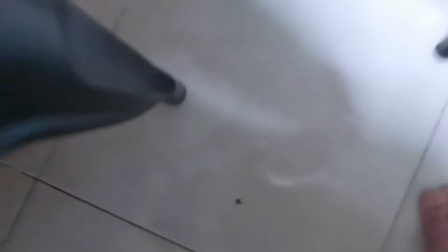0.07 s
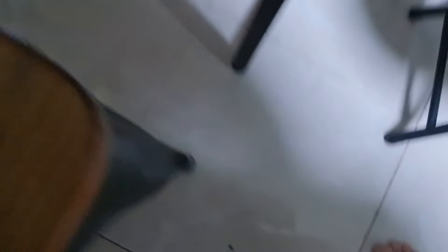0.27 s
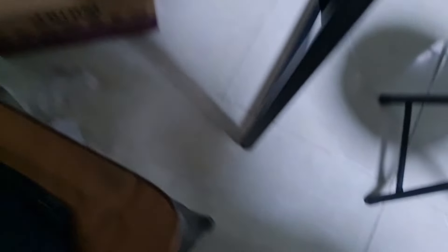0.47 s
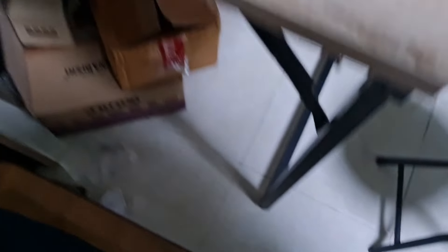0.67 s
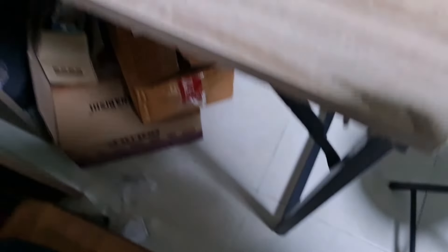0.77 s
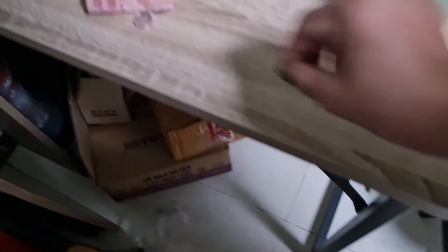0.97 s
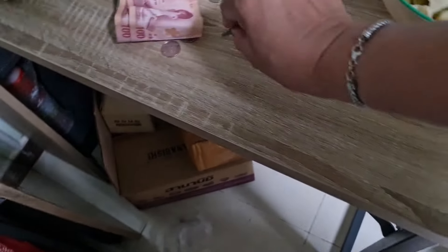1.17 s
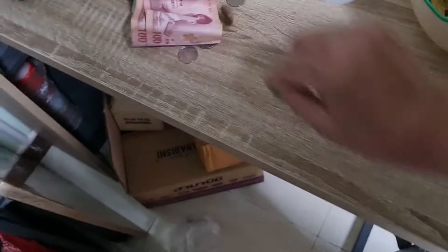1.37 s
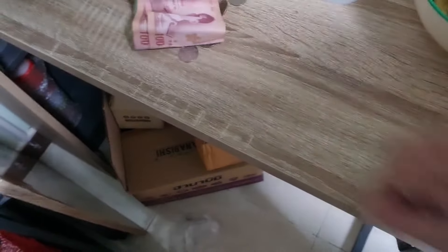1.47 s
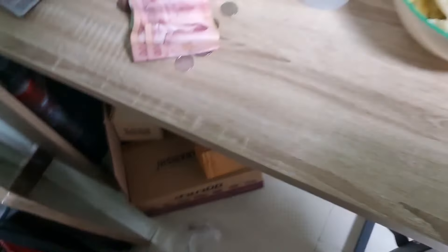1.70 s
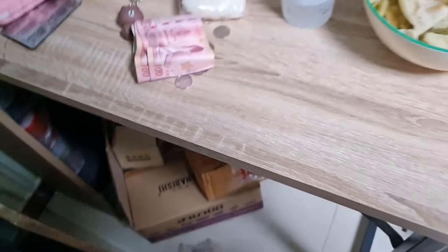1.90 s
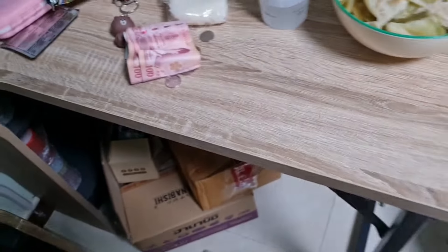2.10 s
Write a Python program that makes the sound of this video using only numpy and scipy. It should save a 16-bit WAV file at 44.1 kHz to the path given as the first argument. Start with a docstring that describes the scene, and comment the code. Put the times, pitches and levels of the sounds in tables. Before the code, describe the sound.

A coin lands on a wooden desk with a sharp knock, bounces, then rattles faster and softer until flat. Faint rustling and small bumps come first, over low appliance hum in a small room, closely miked.

```python
"""A coin drops on a wooden desk, bounces from face to rim and rattles ever faster until it lies flat.
Each contact is a noise burst and damped modes for the board, a bright burst for the rim and
high wavering modes for the ringing coin; decaying noise tails make the small room answer.
Behind it an appliance hums in steady sine tones over soft air noise. Someone moving is heard as
shaped noise for rustle, rumble and brushing, with low bumps, small ticks and thin rings."""
import sys
import numpy as np
from scipy import signal
from scipy.fft import rfft, irfft, next_fast_len
from scipy.io import wavfile
from scipy.ndimage import map_coordinates

SR = 44100
rng = np.random.default_rng(int(sys.argv[2]) if len(sys.argv) > 2 else 0)


def unload_wav(signal):
    """Save mono or channel-first audio to the path in sys.argv[1] as 16-bit WAV at rate SR, clipped to [-1, 1]."""
    wavfile.write(
        sys.argv[1],
        SR,
        np.round(np.clip(np.atleast_2d(signal).T, -1, 1) * 32767).astype(np.int16),
    )


N = 94594


def amp(db):
    """Gain from decibels."""
    return 10 ** (np.asarray(db) / 20)


def unit(x):
    """Scale to rms 1."""
    return x / np.sqrt(np.mean(x ** 2) + 1e-20)


def along(points, hz):
    """Read (frequency [Hz], value) points on a log frequency axis."""
    f, v = np.transpose(points)
    return np.interp(np.log(hz + 1), np.log(f + 1), v)


def level(points):
    """Gain per sample from (time [s], level [dB]) points."""
    return amp(np.interp(np.arange(N) / SR, *np.transpose(points)))


def wobble(rate, count=N):
    """A smooth random curve with rate knots a second."""
    knots = rng.standard_normal(int(count * rate / SR) + 4)
    return map_coordinates(knots, [np.arange(count) * rate / SR])


def fade(t, t60):
    """Exponential decay, 60 dB down after t60 seconds."""
    return amp(-60 * t / t60)


DULL_HZ = 2230  # corner of the bass shelf


def colour(x, points, bass_db=0):
    """Minimum-phase filter through (frequency [Hz], level [dB]) points, unit power before the bass shelf."""
    n = x.shape[-1]
    m = 2 ** int(np.ceil(np.log2(n)) + 1)
    hz = np.fft.rfftfreq(m, 1 / SR)
    shelf = amp(bass_db / (1 + (hz / DULL_HZ) ** 2))
    gain = unit(amp(along(points, hz))) * shelf
    # folding the cepstrum forward in time makes the filter causal
    cepstrum = irfft(np.log(gain + 1e-6))
    cepstrum[1:m // 2] *= 2
    cepstrum[m // 2 + 1:] = 0
    return irfft(rfft(x, m) * np.exp(rfft(cepstrum)))[..., :n]


def add(out, s, sound):
    """Mix a sound in at time s."""
    part = out[:, round(s * SR):][:, :sound.shape[-1]]
    part += sound[..., :part.shape[1]]


def noise(points, width):
    """Coloured stereo noise of rms 1; width is the share of side signal."""
    mid, side = colour(rng.standard_normal((2, N)), points)
    return unit(np.array([mid + width * side, mid - width * side]))


WANDER_HZ, WANDER_RAD, FLUTTER_DB = 45, .55, 3  # knots a second, phase drift, level flutter


def waver(count):
    """Random drift in phase and flutter in level, a little different in each channel."""
    common = wobble(WANDER_HZ, count)
    own = np.array([wobble(WANDER_HZ, count), wobble(WANDER_HZ, count)])
    return WANDER_RAD * (common + .5 * own), amp(FLUTTER_DB * own)


def ring(modes, t, spread, scatter_db=2):
    """Damped, wavering modes; each blow and each channel gets them a little differently."""
    out = np.zeros((2, len(t)))
    drift, flutter = waver(len(t))
    for hz, db, t60 in modes:
        phase = rng.uniform(0, 2 * np.pi) + spread * rng.standard_normal((2, 1)) + drift
        gain = amp(db + scatter_db * rng.standard_normal((2, 1)))
        out += gain * fade(t, t60) * np.sin(2 * np.pi * hz * t + phase)
    onset = 1 - fade(t, 0.0023)
    return out * flutter * onset


MONO_BELOW_HZ = 540


def narrow_bass(x):
    """Two close microphones hear long waves alike, so the side signal loses its bass."""
    mid, side = (x[0] + x[1]) / 2, (x[0] - x[1]) / 2
    high_pass = signal.butter(2, MONO_BELOW_HZ, "high", fs=SR, output="sos")
    side = signal.sosfilt(high_pass, side)
    return np.array([mid + side, mid - side])


# air of the room: (frequency [Hz], relative level [dB])
AIR_COLOUR = [(25, -1.5), (55, -0.5), (110, -1), (200, -3.5), (290, -14), (400, -12), (700, -24),
              (2000, -37.5), (6500, -38.5), (9000, -55), (16000, -58)]
AIR_DB = -53.5


def room_air():
    """Steady soft noise of the room, weighted to the bass."""
    return amp(AIR_DB) * noise(AIR_COLOUR, width=0.51)


# tones of the appliance: (frequency [Hz], relative level [dB])
HUM_TONES = [(99, -57.5), (166, -54.5), (199, -61.5), (382, -73)]
# swell of the whole hum: (time [s], level [dB])
HUM_SWELL = [(0, 1), (.35, 2), (1.05, -0.5), (1.22, -4), (2.14, -7.5)]


def hum():
    """Appliance tones, slightly unsteady in level and phase."""
    t = np.arange(N) / SR
    tones = np.zeros(N)
    for hz, db in HUM_TONES:
        gain = np.sqrt(2) * amp(db + 1.63 * wobble(8.77))  # root 2 makes the level an rms
        tones += gain * np.sin(2 * np.pi * hz * t + .5 * wobble(8.98))
    return level(HUM_SWELL) * tones


# low rumble: (frequency [Hz], relative level [dB])
RUMBLE_COLOUR = [(25, -12), (55, 3), (100, -1.5), (160, 0), (300, -22), (800, -54)]
# its course: (time [s], level [dB])
RUMBLE_COURSE = [(0, -75), (.25, -58), (.55, -55.5), (.68, -74), (1.3, -69), (1.65, -52.5), (1.93, -51.5),
                 (2.14, -61)]


def rumble():
    """Low, nearly mono noise that swells and sinks with the movement."""
    return level(RUMBLE_COURSE) * noise(RUMBLE_COLOUR, width=0.25)


# rustle: (frequency [Hz], relative level [dB])
RUSTLE_COLOUR = [(150, 2), (400, -3), (1000, 0), (2000, -6), (3000, -6.5), (6500, -13), (9500, -23.5),
                 (15500, -24)]
# its strokes: (time [s], level [dB])
RUSTLE_STROKES = [(0, -73.5), (.15, -69), (.22, -63), (.32, -57.5), (.42, -61), (.56, -70), (.63, -68.5),
                  (.655, -58.5), (.71, -65), (.79, -66), (.92, -78.5), (1.1, -66.5)]
# the quiet it drops to and holds: (time [s], level [dB])
RUSTLE_QUIET = [(1.1, -77)]
RUSTLE_GRAIN_DB = 1


def rustle():
    """Wide noise in soft strokes, its level roughened by a quick random grain."""
    strokes = level(list(RUSTLE_STROKES) + list(RUSTLE_QUIET))
    grain = amp(RUSTLE_GRAIN_DB * wobble(90.4))
    return strokes * grain * noise(RUSTLE_COLOUR, width=0.99)


# soft brushing just before the drop: (time [s], level [dB])
BRUSH_STROKE = [(1.12, -100), (1.15, -69), (1.28, -62.5), (1.36, -100)]
# its colour: (frequency [Hz], relative level [dB])
BRUSH_COLOUR = [(600, -14), (1600, -6), (2100, 2), (2500, -5), (3400, -3), (6000, -14), (9000, -29)]


def brushing():
    """One stroke of mid-range noise."""
    return level(BRUSH_STROKE) * noise(BRUSH_COLOUR, width=0.67)


# soft bumps: (time [s], level [dB])
BUMP_HITS = [(0.404, -35.5), (0.504, -40), (1.029, -43)]
BUMP_HZ, BUMP_T60_S = 56.3, 0.19


def bumps(out, t):
    """Mix in soft bumps: a damped low sine with a rounded onset."""
    for s, db in BUMP_HITS:
        envelope = fade(t, BUMP_T60_S) * (1 - fade(t, .03))
        add(out, s, amp(db) * envelope * np.sin(2 * np.pi * BUMP_HZ * t))


# handling ticks: (time [s], level [dB], centre frequency [Hz])
TICK_HITS = [(0.883, -56.5, 5070), (1.05, -59, 3000), (1.13, -58, 2800)]
TICK_T60_S, TICK_FAR_DB = .04, -45  # decay, level far from the centre frequency


def ticks(out, t):
    """Mix in small ticks: short noise bursts in a band round their centre."""
    for s, db, hz in TICK_HITS:
        band = [(hz / 4, TICK_FAR_DB), (hz / 2, -18), (hz, 0), (hz * 1.52, -8), (hz * 3, TICK_FAR_DB)]
        burst_noise = fade(t, TICK_T60_S) * rng.standard_normal((2, len(t)))
        add(out, s, amp(db) * colour(burst_noise, band))


# faint thin rings: (time [s], mean level [dB], frequency [Hz], t60 [s])
THIN_RINGS = [(.425, -65, 2850, .6), (.648, -63, 1010, .15), (1.13, -72, 2090, .8)]


def thin_rings(out, t):
    """Mix in single damped modes, broken up by a fast random curve."""
    for s, db, hz, t60 in THIN_RINGS:
        add(out, s, ring([(hz, db, t60)], t, spread=0.42) * wobble(160, len(t)))


def movement():
    """Someone moving: noise layers with bumps, ticks and thin rings on top."""
    out = rustle() + rumble() + brushing()
    t = np.arange(SR // 2) / SR
    bumps(out, t)
    ticks(out, t)
    thin_rings(out, t)
    return out


SNAP_SHARE, SNAP_LAG_S = 0.33, .0003  # the snap comes late in the left channel
SAME_SHARE = .65  # power share of the paths that every blow has in common
EARLY_DB, EARLY_T60_S = -7.5, 0.12  # near walls


def burst(t, paths, hold, t60, room_db, room_t60):
    """A snap, a dense short shudder, then near walls and the room, as decaying noise."""
    direct = fade(np.maximum(t - hold, 0), t60)
    early = amp(EARLY_DB) * fade(t, EARLY_T60_S)
    room = amp(room_db) * fade(t, room_t60)
    envelope = np.sqrt(direct ** 2 + early ** 2 + room ** 2)
    fresh = rng.standard_normal(paths.shape)
    out = envelope * (np.sqrt(SAME_SHARE) * paths + np.sqrt(1 - SAME_SHARE) * fresh)
    snap = SNAP_SHARE * np.linalg.norm(direct)
    out[[0, 1], [round(SNAP_LAG_S * SR), 0]] += snap
    return out


# colour of the knock: (frequency [Hz], relative level [dB])
KNOCK_COLOUR = [(100, -36), (280, -11.5), (410, -9.5), (530, -5.5), (650, -6), (1000, -3), (1350, -1),
                (2000, -2.5), (2900, -1.5), (4100, -0.5), (5000, -6.5), (5600, -13), (6400, -7),
                (7400, -19.5), (9000, -29.5), (11000, -16.5), (16000, -39)]
HARD_DB, DULL_DB_PER_DB = -10.5, 0.3148  # knock with a flat shelf, bass change per dB of knock


def board_knock(t, paths, knock_db):
    """The board's broad thud; light taps give less bass than hard blows."""
    bass_db = DULL_DB_PER_DB * (knock_db - HARD_DB)
    thud = burst(t, paths, hold=0.0016, t60=0.025, room_db=-11, room_t60=0.27)
    return colour(thud, KNOCK_COLOUR, bass_db)


# modes of the board: (frequency [Hz], mean relative level [dB], t60 [s])
BOARD_MODES = [(537.3, -2.5, 0.14), (828, -3, .15), (1059, -3, 0.17), (1363, 0, 0.17), (1419, -3, 0.34),
               (1660, -7.5, 0.25), (1925, 0, 0.21), (2096, 1, 0.25), (2390, -7, 0.069), (2570, -5, .15),
               (2974, 3, 0.26), (3524, 0, 0.24), (4150, -3, 0.38), (4770, -11, 0.12)]
BOARD_DB = -13.5


def board_ring(t):
    """The wood's own damped modes, sounding under each knock."""
    return amp(BOARD_DB) * ring(BOARD_MODES, t, spread=1.17) / np.sqrt(len(BOARD_MODES) / 2)


# colour of the rim click: (frequency [Hz], relative level [dB])
CLICK_COLOUR = [(1000, -37), (4500, -3.5), (6500, 5.5), (9000, -0.5), (11000, 1.5), (13000, 0.5),
                (15500, 0), (16600, -29)]


def rim_click(t, paths):
    """The hard rim's bright, very short burst; reversed paths keep it apart from the knock."""
    tap = burst(t, paths[:, ::-1], hold=0.00064, t60=0.015, room_db=-15, room_t60=0.26)
    return colour(tap, CLICK_COLOUR)


# modes of the coin: (frequency [Hz], mean relative level [dB], t60 before the settling damping [s])
COIN_MODES = [(10402, -0.5, 0.75), (11270, -12.5, 0.77)]
TUMBLE_HZ, TUMBLE_DEPTH = 25.7, 0.41
FLAT_DAMP_DB_PER_S = 450  # extra damping reached as the coin lies down


def coin_ring(t, flat):
    """High modes that the turning coin beams to and fro, damped more the flatter it lies."""
    tumble = 1 - TUMBLE_DEPTH * np.cos(2 * np.pi * TUMBLE_HZ * t)
    return ring(COIN_MODES, t, spread=0.27) * tumble * amp(-FLAT_DAMP_DB_PER_S * flat * t)


# last spin on the rim: start and stop time, first gap, each gap over the one before
SPIN_START_S, SPIN_STOP_S, SPIN_GAP_S, SPIN_SHRINK = 1.959, 2.059, .0085, 0.95
SPIN_KNOCK_DB, SPIN_CLICK_DB, SPIN_RING_DB = -32.5, -40.5, -64  # mean levels at the start
SPIN_FADE_DB, SPIN_SCATTER_DB = 3.5, 2.5


def spin():
    """Contacts of the rim crowd together and weaken as the coin settles."""
    rows, s, gap = [], SPIN_START_S, SPIN_GAP_S
    for luck in rng.standard_normal(40):
        if s < SPIN_STOP_S:
            progress = (s - SPIN_START_S) / (SPIN_STOP_S - SPIN_START_S)
            db = SPIN_SCATTER_DB * luck - SPIN_FADE_DB * progress
            rows.append((s, SPIN_KNOCK_DB + db, SPIN_CLICK_DB + db, SPIN_RING_DB + db))
        s += gap
        gap *= SPIN_SHRINK
    return rows


# contacts of the coin before the spin, levels relative to the coin layer:
# (time [s], board knock level [dB], rim click level [dB], coin ring level [dB])
COIN_CONTACTS = [(1.3075, -20, -30, -55), (1.3098, -8.5, -33, -51), (1.4268, -24.5, -54, -66),
                 (1.4375, -14.5, -39, -26.5), (1.4405, -16, -15.5, -28), (1.5152, -15, -26.5, -31.5),
                 (1.5556, -17.5, -37, -37), (1.6171, -19, -26, -57), (1.6301, -17, -20.5, -60),
                 (1.644, -24, -44, -53), (1.6802, -23.5, -32.5, -35), (1.7179, -22.5, -31, -64),
                 (1.7423, -29, -33, -60), (1.7667, -22, -23, -58), (1.772, -24.5, -29, -57),
                 (1.778, -24, -26.5, -46), (1.8115, -30.5, -26.5, -36), (1.8241, -23.5, -36, -45),
                 (1.8295, -23.5, -24.5, -57), (1.8402, -27.5, -29, -54), (1.8675, -27, -37, -50),
                 (1.8745, -23.5, -33, -51), (1.8792, -30.5, -27, -63), (1.892, -27, -36, -63),
                 (1.912, -30, -35, -63), (1.917, -26, -43, -47), (1.923, -24.5, -31, -62),
                 (1.9305, -33, -42, -70), (1.9468, -36, -29, -62), (1.9535, -27, -44, -37)]
BALANCE_DB = -.5  # left gain; the right gets the opposite


def coin():
    """Every contact knocks the board, clicks on the rim and rings the coin, ever more briefly."""
    out, t = np.zeros((2, N)), np.arange(2 ** 14) / SR
    paths = rng.standard_normal((2, len(t)))
    first_s = COIN_CONTACTS[0][0]
    for s, knock_db, click_db, ring_db in list(COIN_CONTACTS) + spin():
        flat = ((s - first_s) / (SPIN_STOP_S - first_s)) ** 4  # 0 at the drop, 1 lying down
        wood = amp(knock_db) * (board_knock(t, paths, knock_db) + board_ring(t))
        click = amp(click_db) * rim_click(t, paths)
        metal = amp(ring_db) * coin_ring(t, flat)
        add(out, s, wood + click + metal)
    return narrow_bass(out) * amp([[BALANCE_DB], [-BALANCE_DB]])


def scene():
    """The coin on the desk in the quiet room."""
    return room_air() + hum() + movement() + amp(-3.5) * coin()


TOP_HZ = 16400


def record(dry):
    """The recorder's band limit: a very steep low-pass."""
    m = next_fast_len(N + SR // 2)
    hz = np.fft.rfftfreq(m, 1 / SR)
    low_pass = 1 / np.sqrt(1 + (hz / TOP_HZ) ** 160)
    return irfft(rfft(dry, m) * low_pass, m)[:, :N]


dry = scene()
out = record(dry)
unload_wav(out)
```